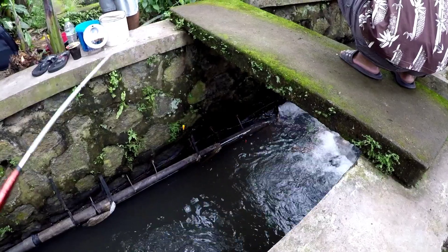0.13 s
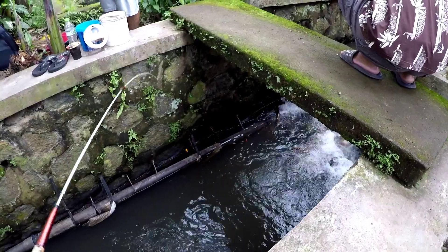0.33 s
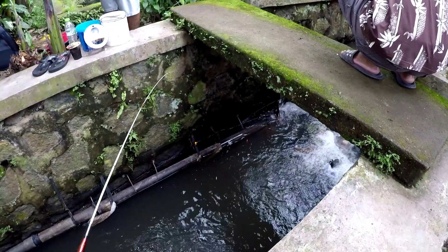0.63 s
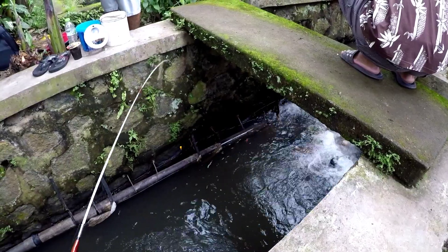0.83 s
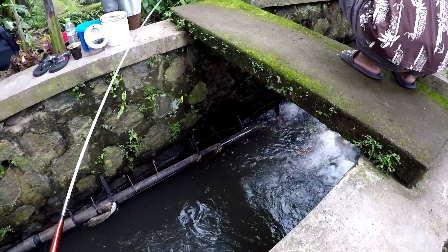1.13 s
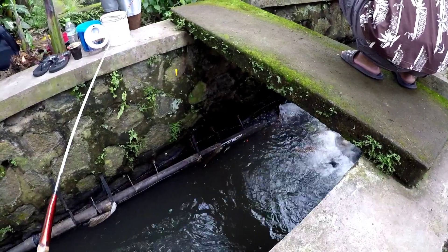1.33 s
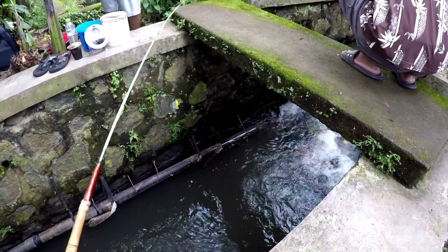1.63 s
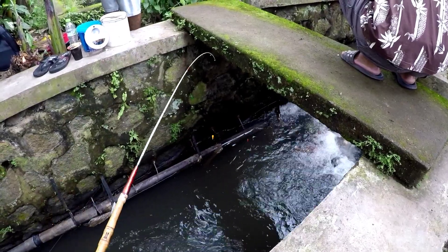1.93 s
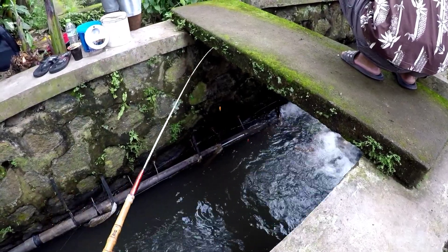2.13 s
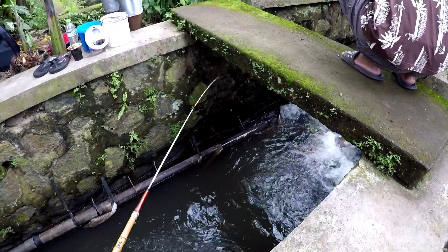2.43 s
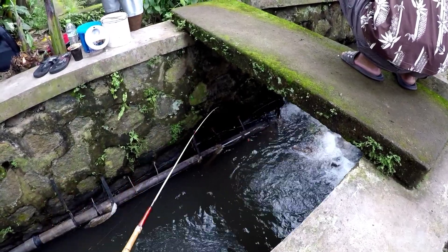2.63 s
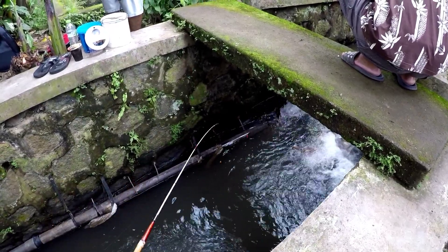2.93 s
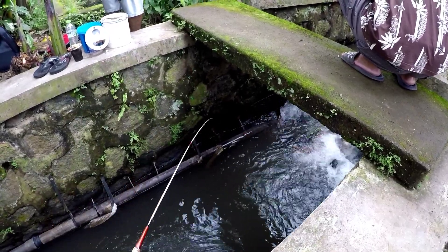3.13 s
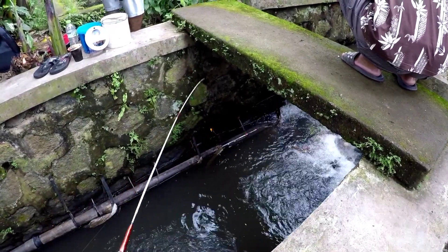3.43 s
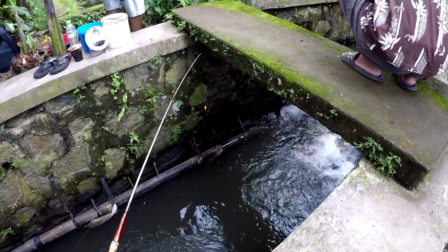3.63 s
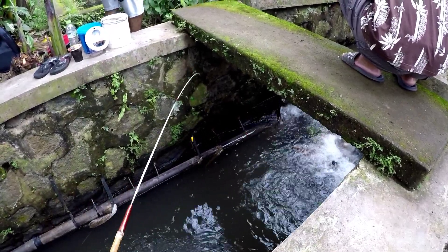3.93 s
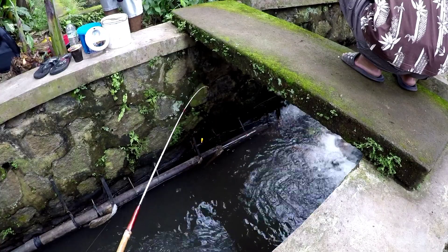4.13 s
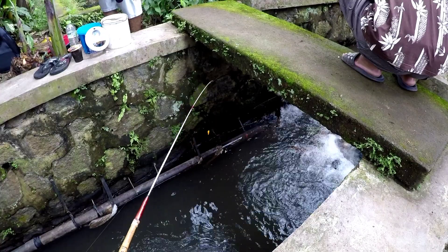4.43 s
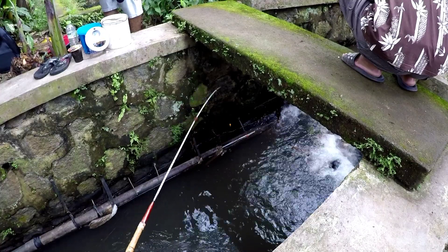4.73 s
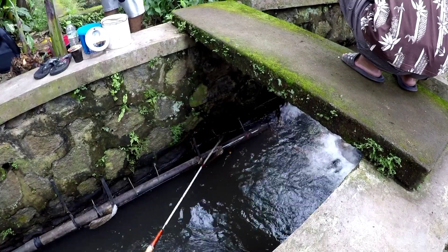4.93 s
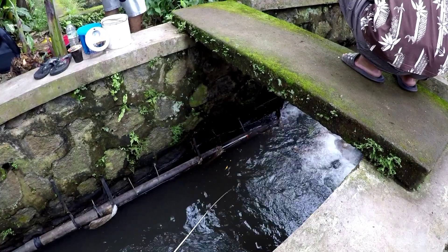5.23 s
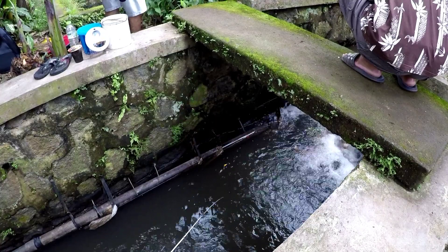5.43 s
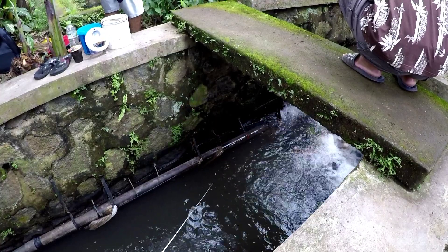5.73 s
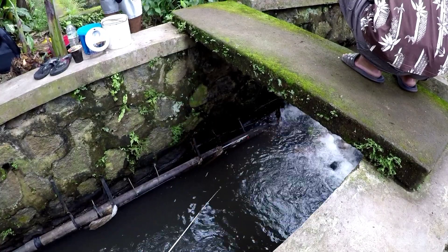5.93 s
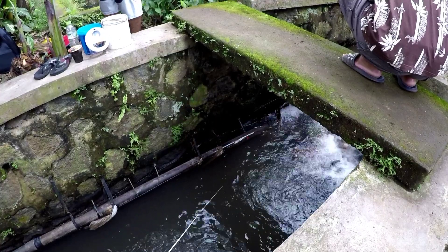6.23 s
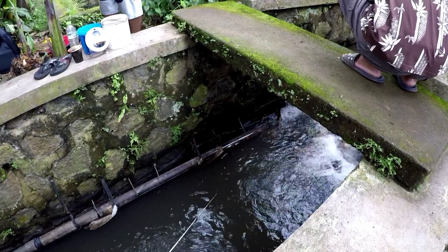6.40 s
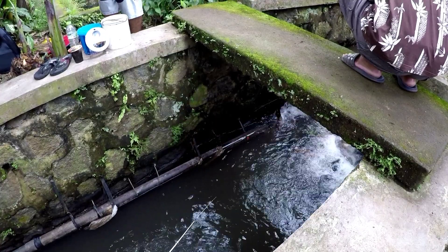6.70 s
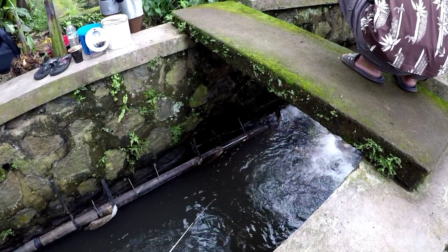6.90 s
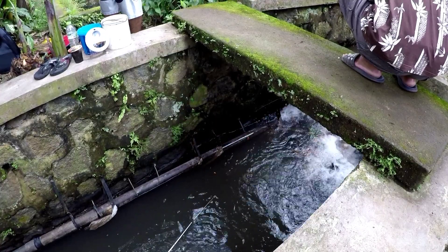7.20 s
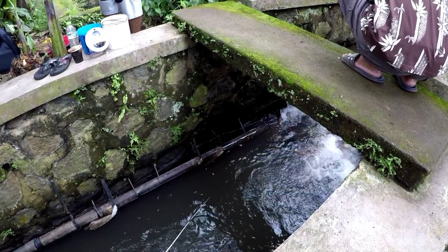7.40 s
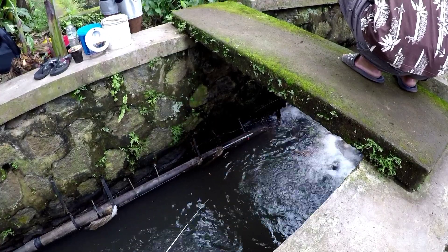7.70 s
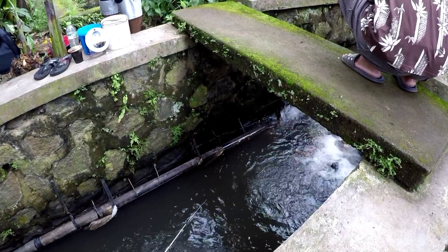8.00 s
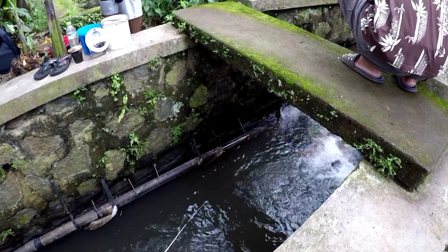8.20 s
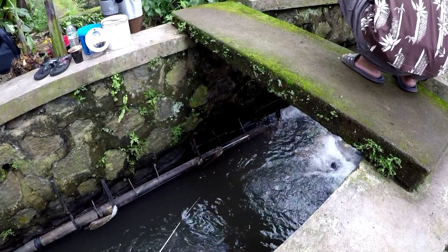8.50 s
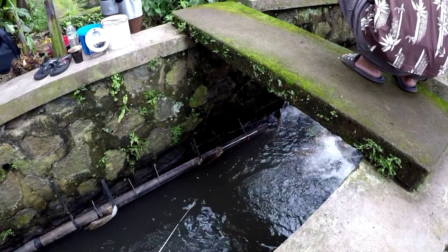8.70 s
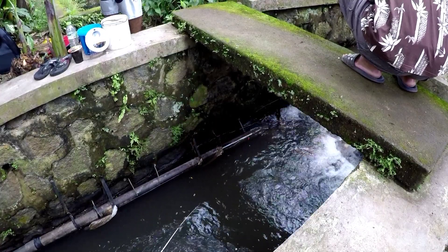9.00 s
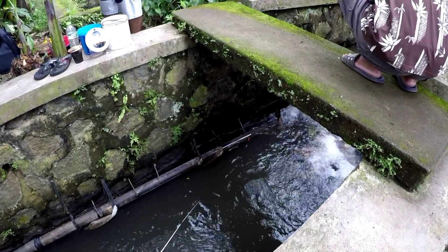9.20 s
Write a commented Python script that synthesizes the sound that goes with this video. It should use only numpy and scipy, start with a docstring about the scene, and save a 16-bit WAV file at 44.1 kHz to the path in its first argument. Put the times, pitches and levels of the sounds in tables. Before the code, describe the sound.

A continuous loud cascade in a narrow stone and concrete ditch, heard from just above. Deep pulsing rumble and culvert boom lie beneath hollow gurgling, dense splashing and a soft spray hiss, with close reflections from hard walls. The first moments are dull and nearly mono; the sound quickly grows fuller and wider, then holds steady with only small random surges and occasional low gulps until it stops.

```python
"""Water plunging from a culvert

Water pours out of a culvert and plunges into a stone-walled ditch, a few metres below the listener.
Filtered noise makes the plunge rumble and boom; big ringing bubbles gurgle, small ones splash, spray hisses on top.
The sound starts narrow and dull, then opens to almost full stereo in about two seconds."""
import sys
import numpy as np
from scipy import signal
from scipy.fft import rfft, irfft
from scipy.io import wavfile
from scipy.ndimage import uniform_filter1d

SR = 44100
rng = np.random.default_rng(int(sys.argv[2]) if len(sys.argv) > 2 else 0)


def file_out(sig):
    """Save sig as 16-bit WAV at sys.argv[1]."""
    # one column per channel
    cols = np.atleast_2d(sig).T
    # limit, then scale
    lim = np.clip(cols, -1, 1)
    pcm = np.round(lim * 32767).astype(np.int16)
    wavfile.write(sys.argv[1], SR, pcm)


N = 412379
TIME, BIN_HZ = np.arange(N) / SR, np.fft.rfftfreq(N, 1 / SR)

# Levels in these tables are relative: trims and the stereo stage come after them.
# Rolling of the plunge: time_s, rumble_db, boom_db
PLUNGE_ROLL = [(0.0, -34, -28), (0.2, -33, -16), (0.28, -29, -24.5), (0.46, -25, -23), (0.56, -26, -16.5),
               (0.82, -25, -19), (1.0, -20, -15.5), (1.25, -23, -15.5), (1.45, -22.5, -20),
               (1.75, -19.5, -21), (1.9, -22, -15), (2.3, -24, -18.0), (2.6, -25, -18), (2.93, -25, -16.5),
               (3.03, -26, -16.5), (3.2, -24, -17), (3.45, -25, -17), (3.8, -26, -17.5), (3.92, -22, -19),
               (4.02, -29, -15), (4.25, -24, -17.5), (4.55, -20.5, -20), (5.0, -27, -16.5), (5.2, -24, -17),
               (5.35, -23, -23), (5.47, -24, -18), (5.85, -24.5, -16.5), (6.3, -23.5, -16.5),
               (6.7, -26, -18.5), (7.1, -23, -17), (7.5, -22.5, -18.5), (7.65, -26, -17), (7.8, -20.5, -19),
               (8.5, -21.5, -18.5), (8.85, -21, -18), (9.0, -32, -16.5), (9.34, -27, -15.5)]
# Churning of the pool: time_s, deep_gurgle_db, upper_gurgle_db
POOL_CHURN = [(0.0, -33, -28), (0.2, -35, -28.5), (1.0, -31, -26.5), (2.2, -29, -28), (2.9, -26.5, -26),
              (3.4, -29.5, -26.5), (3.6, -29.5, -28), (4.4, -27, -27.5), (4.6, -28, -27.5),
              (5.0, -28.5, -27.5), (5.2, -30.5, -28), (5.4, -28, -27), (5.8, -25.5, -28.5), (6.6, -27, -26),
              (7.5, -25, -27.5), (7.6, -26.5, -26), (8.6, -26, -27), (9.34, -27, -27)]
# Surging of the white water: time_s, open_splash_db, recess_ring_db
WHITE_WATER_SURGE = [(0.0, -35, -40), (0.2, -35, -39), (0.45, -36, -46), (0.65, -35.5, -41),
                     (0.8, -33.5, -47), (1.3, -32, -46), (2.0, -30.5, -38), (2.25, -30.5, -42),
                     (2.6, -30, -38), (3.1, -29, -40), (3.7, -30.5, -39), (4.2, -29.5, -38),
                     (4.8, -29.5, -42), (5.1, -31, -36.5), (5.8, -28.5, -41), (6.4, -30.5, -40.5),
                     (7.2, -30, -35.5), (8.0, -28.5, -40.5), (8.5, -29.5, -34.5), (8.9, -30.1, -36.5),
                     (9.1, -29.5, -34.5), (9.34, -31, -39)]
# Air resonances of the culvert, two for its boom and then its overtones: pitch_hz, width_hz, level_db
CULVERT_MODES = [(100.6, 26.5, 1), (126, 28, -11.5), (162.9, 36, -5), (182, 18, -13.5), (197.4, 19, -10.5),
                 (237.5, 79, -12.5), (284.5, 25, -14)]
# Hollows between the walls and the pool: pitch_hz, width_hz, level_db
HOLLOW_MODES = [(359.3, 25.5, 1.2), (449, 186, -2), (585, 130, -3.5), (713, 124, -2), (857, 162, -5),
                (960, 400, -14.5)]
# Resonances of the recess under the slab: pitch_hz, width_hz, level_db
RECESS_MODES = [(1252, 56, -6.5), (1505, 70, -4.5), (1657, 115, -0.5), (1747, 130, -2), (1995, 120, -8),
                (3480, 380, -9.5)]
# Colour of the splashing: pitch_hz, level_db (per Hz)
SPLASH_COLOUR = [(300, -11), (700, -3.5), (1000, -1), (1200, -3.5), (1450, -2.2), (1680, -2.5), (1890, -4),
                 (2020, -4), (2600, -7), (3100, -6), (3550, -7.5), (4100, -11), (5500, -31), (9000, -57)]
# Colour of the spray: pitch_hz, level_db (per Hz)
SPRAY_COLOUR = [(2500, -13.5), (4100, -5.5), (5000, -3), (5600, -2.5), (6400, 0), (7100, -0.5), (7800, -4),
                (8100, -8), (9600, -11), (10500, -15.5), (11300, -24.5), (12600, -21), (14200, -28.5),
                (14800, -40)]
# Differences between two microphone ports: pitch_hz, left_minus_right_db, coherence (0-1), left_lead_radians
PORT_DIFFERENCES = [(30, -1.7, .995, -.3), (100, -5, .997, -.12), (200, -7.7, .994, .3),
                    (305, -8.5, .98, .95), (400, -4.4, .98, 1.5), (600, -1.5, .96, 2.55),
                    (720, -2.5, .97, 2.95), (940, -6.2, .84, 2.5), (1220, 4, .73, 1.6),
                    (1450, 10.8, .42, .3), (1680, 5, .8, -1.1), (2050, -.8, .7, -.45),
                    (3150, -.8, .66, -.2), (3500, -.2, .95, 0), (4200, 0, .97, 0), (5200, 1, .42, .1),
                    (6300, 3, .5, .9), (7100, 7, .25, 1.5), (7900, 3, .08, 2.7), (9500, -2.5, .05, 2.3),
                    (11800, 2, .3, -.1)]
# How the sound opens out: time_s, stereo_share (0-1)
STEREO_OPENING = [(.22, 0), (.32, 0.08), (.42, 0.26), (.52, 0.37), (.7, 0.56), (.9, .64), (1.15, 0.82),
                  (1.5, .88), (2.1, 0.99), (2.8, 0.99)]
# Tone of the narrow sound at the start: pitch_hz, gain_db
NARROW_TONE = [(100, 0.5), (200, 5), (400, 3.5), (520, -4), (660, -7), (720, -14), (800, -9), (940, -3.5),
               (1260, 1), (1520, -4), (1750, -3.5), (2050, 2), (2400, 0.5), (2700, 0), (3500, -3.5),
               (4200, 3), (5400, -0.5), (6200, -13), (6900, -28), (7800, -22), (9500, -13), (12300, -6),
               (14500, 4)]
# Colour of the deep rumble: pitch_hz, level_db (per Hz)
RUMBLE_COLOUR = [(8, -31), (20, -2), (34, -1.5), (44, -3), (54, 8.5), (63, -4.5), (73, 7.5), (82, -7.5),
                 (98, -9.5), (200, -65)]
# Echoes from the ledge, the slab and the stone walls: delay_s, level_db (before the treble is dulled)
WALL_ECHOES = [(.0029, -34.5), (.0041, -23.5), (.0062, -19.5), (.0094, -20), (0.01, -25), (0.015, -19.5),
               (0.0199, -19)]
# Swelling of the culvert's overtones: time_s, level_db
OVERTONE_SWELL = [(0, -28), (.5, -23), (1.25, -21.5), (1.7, -20), (2.4, -20), (3.3, -19), (3.65, -20.5),
                  (3.95, -19.5), (4.4, -19.5), (4.9, -20), (5.15, -22), (5.7, -19.5), (6.5, -21.5),
                  (7.2, -20), (8.4, -20.5), (9.34, -21.5)]
# Pockets of air dragged under by the plunge: middle_s, half_length_s, pitch_hz, level_db
AIR_GULPS = [(1.72, 0.11, 53, -27), (2.12, 0.048, 274, -28), (2.83, 0.064, 295, -28),
             (3.42, .06, 181.3, -20), (4.18, 0.055, 100, -20.5), (4.53, 0.054, 230, -24.5),
             (4.72, 0.1, 160, -18.5), (4.96, .05, 255, -25), (5.45, 0.069, 400, -30),
             (5.82, 0.084, 501, -30.5), (5.85, .06, 45.2, -25), (6.5, .05, 98.4, -15),
             (6.59, 0.081, 44, -20), (7.13, 0.056, 250.7, -23), (7.15, .05, 343, -30),
             (7.41, .07, 468, -30), (8.27, 0.063, 215.5, -24), (8.63, .06, 165.3, -21),
             (9.18, 0.047, 59.5, -20)]
# Tongues of water that break into a clump of bubbles: middle_s, half_length_s, pitch_hz, level_db
SPLASH_CLUMPS = [(2.56, 0.034, 1730, -38), (3.04, .04, 1730, -40), (3.24, 0.039, 872, -35),
                 (3.41, 0.042, 2670, -38), (4.16, 0.026, 1200, -35), (4.24, 0.027, 2710, -37),
                 (5.7, .03, 3340, -36), (6.05, 0.028, 2325, -37), (6.48, 0.028, 3010, -39),
                 (7.37, 0.028, 1070, -33), (7.57, 0.043, 3010, -35), (8.14, .04, 1110, -35),
                 (8.3, .04, 2430, -37), (8.52, 0.046, 1670, -38)]


def amp(db):
    """Turns decibels into gain."""
    return 10 ** (np.asarray(db) / 20)


def evened(x):
    """Scales a sound to an average strength (rms) of 1."""
    return x / np.sqrt(np.mean(x ** 2) + 1e-20)


def steadied(x, hold_s):
    """Takes the slow swells out of a sound, leaving it at about rms 1."""
    span = max(2, int(hold_s * SR))
    power = uniform_filter1d(uniform_filter1d(x ** 2, span), span // 2)
    return x / np.sqrt(power + 1e-9)


def curve(rows):
    """Reads each column of a time table at every sample."""
    s, *columns = np.transpose(rows)
    return [np.interp(TIME, s, column) for column in columns]


def spectrum(rows):
    """Reads each column of a pitch table at every frequency bin, on a log pitch scale."""
    hz, *columns = np.transpose(rows)
    return [np.interp(np.log(BIN_HZ + 1), np.log(hz + 1), column) for column in columns]


def resonances(modes):
    """Adds the power of steep-sided resonances, as if each were driven on its own."""
    power = 0
    for hz, width_hz, level_db in modes:
        gain = amp(level_db) / (1 + (2 * (BIN_HZ - hz) / width_hz) ** 2)
        power = power + gain ** 2
    return np.sqrt(power)


def coloured(x, gain):
    """Filters a sound by one gain per frequency bin and evens it to rms 1."""
    return evened(irfft(rfft(x) * gain, N))


def coloured_noise(gain):
    """Makes unrelated noise of one colour on the near and on the diffuse path."""
    return coloured(rng.standard_normal((2, N)), gain)


def flutter(rate_hz):
    """Makes a slow random movement of rms 1, mostly below the given rate."""
    return coloured(rng.standard_normal(N), 1 / (1 + (BIN_HZ / rate_hz) ** 2))


def froth(patchy_db, patch_s, patch_hz):
    """Countless merged bubbles: two noises that flare in shared patches of time and pitch."""
    hz, t, cells = signal.stft(rng.standard_normal((2, N)), SR, nperseg=256)
    patches = rng.standard_normal(cells.shape[1:])
    patches = uniform_filter1d(patches, max(1, round(patch_s / t[1])), axis=1)
    patches = evened(uniform_filter1d(patches, max(1, round(patch_hz / hz[1])), axis=0))
    noise = signal.istft(cells * amp(patchy_db * patches), SR, nperseg=256)[1]
    return evened(noise[:, :N])


def bubbles(low_hz, high_hz, per_s, cycles, rise, spread_db, count=32):
    """Bubbles ring and rise in pitch; within their band they are as loud as white noise of rms 1."""
    out = np.zeros((2, N))
    for hz in np.geomspace(low_hz, high_hz, count):
        age = np.arange(0, 4, hz / cycles / SR)  # in decay times, each lasting the given cycles
        when, size, detune, side = rng.random((int(per_s * N / SR / count), 4)).T
        # many small bubbles, few large ones
        size = amp(spread_db * np.minimum(-np.log(1 - size), 4)) * hz
        turns = cycles * (age + rise * age ** 2 / 2)
        turns = turns * (high_hz / low_hz) ** (detune[:, None] / count)
        rings = size[:, None] * np.exp(-age) * np.sin(2 * np.pi * turns)
        # the two paths lie end to end, so one sum places every bubble
        start = (when * (N - len(age))).astype(int) + N * (side > .5)
        places = start[:, None] + np.arange(len(age))
        out += np.bincount(places.ravel(), rings.ravel(), 2 * N).reshape(2, N)
    return evened(out) * np.sqrt((high_hz - low_hz) / (SR / 2))


def add(mix, s, sound):
    """Mixes a sound in at a time in seconds."""
    part = mix[max(0, round(s * SR)):][:len(sound)]
    part += sound[:len(part)]


def played(rows, source):
    """Plays each row of an event table, on the near and on the diffuse path."""
    out = np.zeros((2, N))
    for row in rows:
        for path in out:
            add(path, *source(*row))
    return out


def walls(x, dull_hz=3500):
    """Close hard faces throw the water back and ripple its colour; moss swallows the echoes' treble."""
    echo = sum(amp(level_db) * np.exp(-2j * np.pi * BIN_HZ * delay_s) for delay_s, level_db in WALL_ECHOES)
    dulled = echo / (1 + (BIN_HZ / dull_hz) ** 2)
    return irfft(rfft(x) * (1 + dulled), N)


def ports(x):
    """Two unrelated sounds become the partly shared, phase-shifted sound at a pair of microphone ports."""
    balance_db, coherence, lead = spectrum(PORT_DIFFERENCES)
    coherence = np.clip(coherence, 0, 1)
    near, diffuse = rfft(x)
    shared = near * np.sqrt((1 + coherence) / 2)
    apart = diffuse * np.sqrt((1 - coherence) / 2)
    left = (shared + apart) * amp(balance_db) * np.exp(1j * lead)
    right = shared - apart
    keep_power = np.sqrt(2 / (1 + amp(balance_db) ** 2))
    return irfft(np.array([left, right]) * keep_power, N)


def hollow_note(level_db=-40, fade_s=1.34, hz=655, width_hz=38):
    """A thin hollow note of narrow noise hangs over the water at first and sinks into the rush."""
    ring = coloured(rng.standard_normal(N), resonances([(hz, width_hz, 0)]))
    return amp(level_db) * np.exp(-(TIME / fade_s) ** 2) * steadied(ring, hold_s=0.08)


def spray(surge_db, level_db=-30.5, drops_db=-8):
    """Fine drops fall back on the pool and fizz."""
    drops = bubbles(low_hz=4064, high_hz=12830, per_s=2800, cycles=6, rise=0.032, spread_db=3.5)
    drive = froth(patchy_db=0.62, patch_s=0.041, patch_hz=1790) + amp(drops_db) * drops
    return amp(level_db + surge_db) * coloured(drive, amp(*spectrum(SPRAY_COLOUR)))


def recess(level_db, trim_db=1.0):
    """Splashes under the slab ring in its recess: firm, narrow bands in the rush."""
    ring = steadied(coloured_noise(resonances(RECESS_MODES)), hold_s=0.055)
    return amp(level_db + trim_db) * ring


def clump(middle_s, half_s, hz, level_db, cycles=11, rise=0.032, scatter=.14, count=40):
    """Some dozens of bubbles of similar size ring in quick succession."""
    t = np.arange(0, .03, 1 / SR)
    out = np.zeros(round(6 * half_s * SR))
    for when, size in np.clip(rng.standard_normal((count, 2)), -2, 2):
        age = t * hz * np.exp(scatter * size) / cycles  # in decay times
        turns = cycles * (age + rise * age ** 2 / 2)
        add(out, half_s * (2 + when), np.exp(-age) * np.sin(2 * np.pi * turns))
    gain = amp(level_db) * np.sqrt(2 * half_s * SR / np.sum(out ** 2))
    return middle_s - 2 * half_s, gain * out


def splash(level_db, trim_db=0.5, bubbles_db=-6.5):
    """Small bubbles burst out of the white water: patchy noise with single rings in it."""
    small = bubbles(low_hz=898.8, high_hz=5022, per_s=1000, cycles=12, rise=0.022, spread_db=2.5)
    drive = froth(patchy_db=0.8, patch_s=0.054, patch_hz=700) + amp(bubbles_db) * small
    return amp(level_db + trim_db) * coloured(drive, amp(*spectrum(SPLASH_COLOUR)))


def gurgle(deep_db, upper_db, trim_db=2.5, bubbles_db=-4, deep_hz=570):
    """Large bubbles sound in the hollows between the walls; deep and upper ones have their own swells."""
    large = bubbles(low_hz=321.1, high_hz=1097.6, per_s=360, cycles=11, rise=0.026, spread_db=1.5)
    drive = rng.standard_normal((2, N)) + amp(bubbles_db) * large
    crowd = steadied(coloured(drive, resonances(HOLLOW_MODES)), hold_s=0.25)
    deep = irfft(rfft(crowd) / (1 + (BIN_HZ / deep_hz) ** 10), N)
    upper = crowd - deep
    return amp(trim_db) * (amp(deep_db) * deep + amp(upper_db) * upper)


def gulp(middle_s, half_s, hz, level_db, wander_hz=20.9):
    """A pocket of air throbs up and dies away, its pitch wandering as it changes shape."""
    t = np.arange(-2 * half_s, 2 * half_s, 1 / SR)
    wander = evened(uniform_filter1d(rng.standard_normal(SR), SR // 100))[:len(t)]
    turns = rng.random() + np.cumsum(hz + wander_hz * wander) / SR
    throb = np.sqrt(2) * np.hanning(len(t)) * np.sin(2 * np.pi * turns)
    return middle_s + t[0], amp(level_db) * throb


def plunge():
    """The falling sheet drives clouds of air under; their pulsing rumbles, and booms in the culvert."""
    rumble_db, boom_db = curve(PLUNGE_ROLL)
    overtones_db, = curve(OVERTONE_SWELL)
    rumble = steadied(coloured_noise(amp(*spectrum(RUMBLE_COLOUR))), hold_s=0.25)
    boom = steadied(coloured_noise(resonances(CULVERT_MODES[:2])), hold_s=0.14)
    overtones = steadied(coloured_noise(resonances(CULVERT_MODES[2:])), hold_s=0.26)
    culvert = amp(boom_db) * boom + amp(overtones_db) * overtones
    return amp(rumble_db) * rumble + culvert + played(AIR_GULPS, gulp)


def scene(slosh_db=0.5, spray_follows=0.53):
    """All the water; one uneven slosh moves the gurgle, splash, recess and spray together."""
    deep_db, upper_db = curve(POOL_CHURN)
    splash_db, recess_db = curve(WHITE_WATER_SURGE)
    slosh = slosh_db * flutter(rate_hz=19)
    # the spray follows about half of the splash's swells in decibels
    surge_db = spray_follows * (splash_db - np.median(splash_db)) + slosh
    pool = spray(surge_db) + played(SPLASH_CLUMPS, clump) + splash(splash_db + slosh)
    pool = pool + gurgle(deep_db + slosh, upper_db + slosh)
    water = walls(pool) + recess(recess_db + slosh) + plunge()
    return hollow_note() + ports(water)


def record(dry, lag_radians=1.4, lag_hz=3300, lag_width_hz=770, ceiling=0.92, edge_hz=15000):
    """Dull mono from the left port gives way to stereo; high peaks are rounded, then the top is cut."""
    # the narrow sound lags in one band, which thins out half-way through the opening
    lag = lag_radians * np.exp(-((BIN_HZ - lag_hz) / lag_width_hz) ** 2)
    narrow = irfft(rfft(dry[0]) * amp(*spectrum(NARROW_TONE)) * np.exp(-1j * lag), N)
    opened = np.clip(*curve(STEREO_OPENING), 0, 1)
    heard = (1 - opened) * narrow + opened * dry
    heard = heard / (1 + (heard / ceiling) ** 10) ** (1 / 10)
    # 3 ms fades at both ends
    heard = heard * np.clip(np.minimum(TIME, TIME[-1] - TIME) / .003, 0, 1)
    edge = signal.firwin(511, edge_hz, window=("kaiser", 9), fs=SR)
    return signal.oaconvolve(heard, edge[None], "same", axes=1)


dry = scene()
out = record(dry)
file_out(out)
```